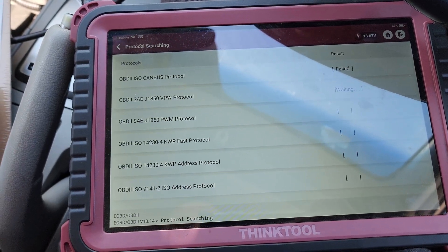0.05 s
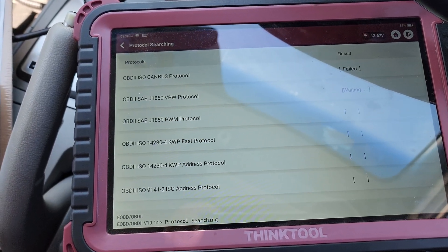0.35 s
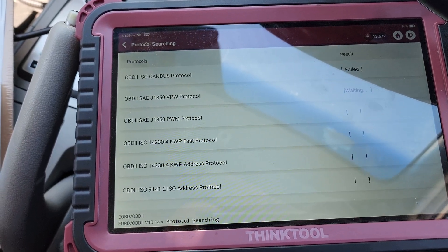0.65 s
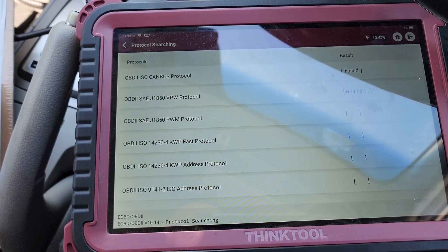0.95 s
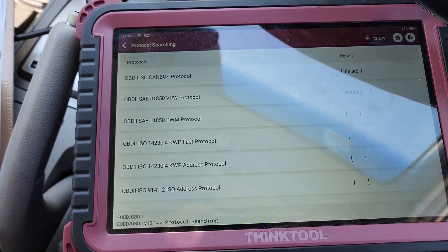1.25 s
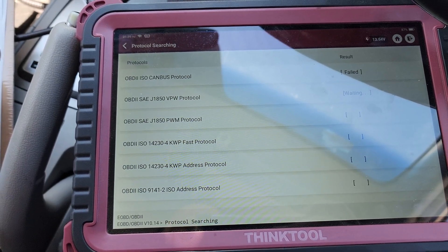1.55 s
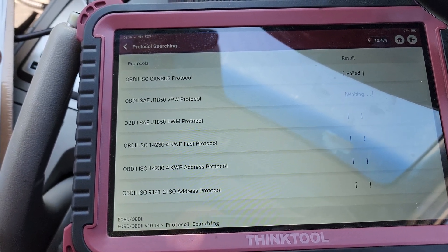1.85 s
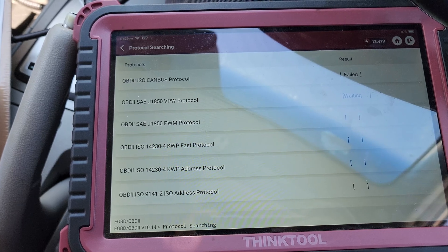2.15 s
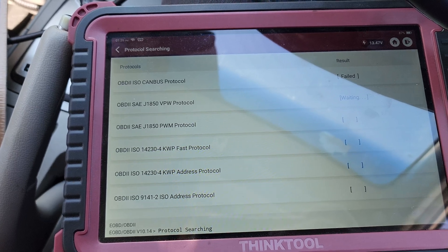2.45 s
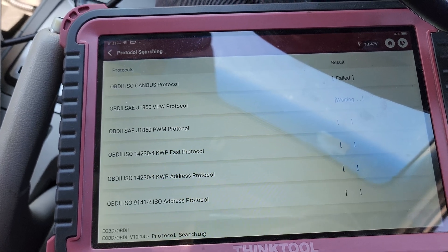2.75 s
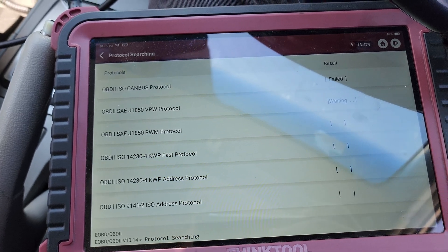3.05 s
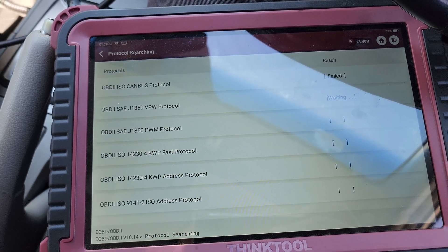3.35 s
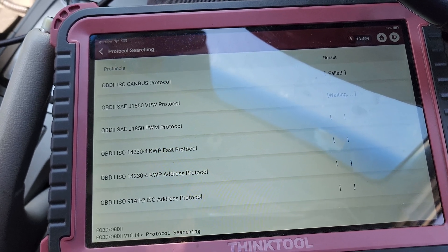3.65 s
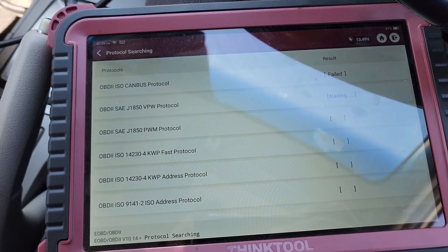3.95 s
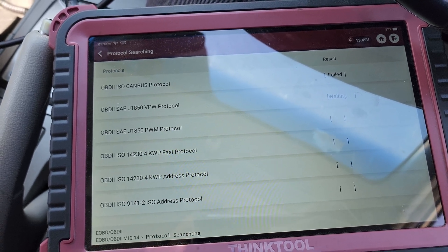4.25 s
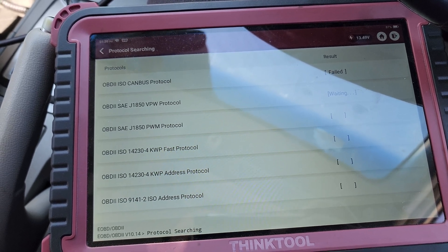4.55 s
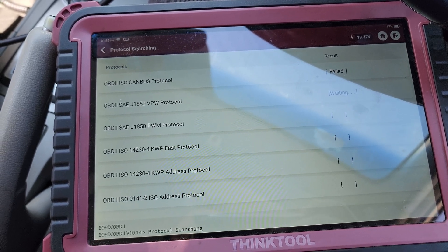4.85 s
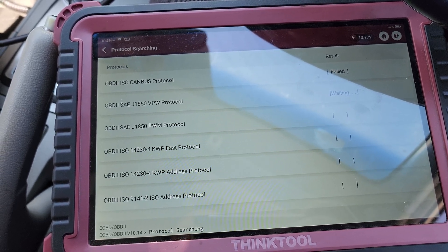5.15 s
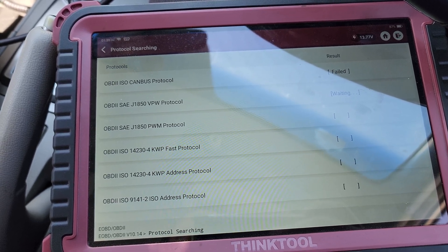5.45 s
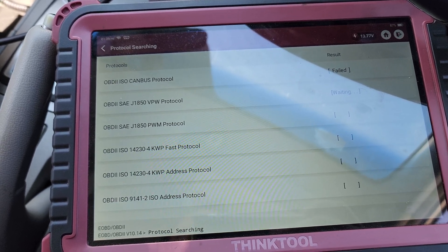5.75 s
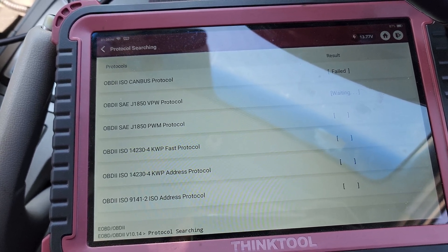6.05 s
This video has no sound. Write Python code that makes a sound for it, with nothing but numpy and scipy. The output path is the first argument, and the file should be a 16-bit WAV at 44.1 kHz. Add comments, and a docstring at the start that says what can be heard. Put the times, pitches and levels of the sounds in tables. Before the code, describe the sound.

Inside a parked car, a petrol engine drops steadily from fast idle to a slow, rough idle. Its deep hum falls in pitch and softens, booming in the cabin and shuddering with irregular misfires. The engine bay whirs behind it and air hisses faintly behind the dash. Close to the microphone, a hand lightly scuffs a plastic tablet at the start and again about two seconds in.

```python
"""Rough idle from inside the car

In a car parked in a workshop, a six-cylinder petrol engine with one weak cylinder sinks from fast idle
to idle, stumbling and misfiring. Its orders sweep down through the cabin's booms over a lumpy shudder.
Beyond the bulkhead the engine bay whirs and the intake growls; air hisses behind the dash.
Close to the two-port microphone, a hand shifts its grip on a plastic tablet."""
import sys
import numpy as np
from scipy import signal
from scipy.fft import rfft, irfft, next_fast_len
from scipy.io import wavfile

SR = 44100
rng = np.random.default_rng(int(sys.argv[2]) if len(sys.argv) > 2 else 0)


def file_out(sig):
    """Save sig as 16-bit WAV at sys.argv[1]."""
    # one column per channel
    cols = np.atleast_2d(sig).T
    # limit, then scale
    lim = np.clip(cols, -1, 1)
    pcm = np.round(lim * 32767).astype(np.int16)
    wavfile.write(sys.argv[1], SR, pcm)


N = 268877
TIME = np.arange(N) / SR
FFT_SIZE = next_fast_len(N, True)
FREQS = np.maximum(np.fft.rfftfreq(FFT_SIZE, 1 / SR), 1)

# stereo width of diffuse sound at the microphone: f/Hz, side minus mid/dB
STEREO_WIDTH = [(30, -27), (55, -25), (68, -16.5), (120, -20.5), (160, -5), (200, -13), (270, -6.5),
                (400, -13.5), (700, 3), (1100, -3.5), (2200, -2), (3000, -0.5), (15000, 0.5)]
# balance of the microphone's two ports: f/Hz, left minus right/dB
PORT_BALANCE = [(60, 0.5), (110, 0), (200, -2.5), (380, 1.5), (700, 1), (1000, -2), (1300, -1.5),
                (1750, -4), (2400, -1), (2800, 1.5), (4400, -4.5), (8120, 2.5), (15000, 5)]

# air behind the dash, before each band's trim: t/s, low band/dB, middle band/dB, top band/dB
HISS_LEVELS = [(0, -59, -59, -68.5), (1.4, -59, -60.5, -71), (2.1, -59, -62, -66),
               (3.85, -56.5, -62.5, -71.5), (4.4, -57.5, -63, -73), (4.95, -55.5, -60.5, -71.5),
               (5.3, -59, -67.5, -78), (6.1, -57.5, -64.5, -79.5)]
# spectra of those three bands: f/Hz, relative level/dB
HISS_LOW_COLOUR = [(1500, -16.5), (2600, -1), (2980, 3), (3400, -0.5), (3900, 1), (4700, -2.5),
                   (5100, -11.5), (9000, -36)]
HISS_MID_COLOUR = [(2500, -36), (4400, -4.5), (5350, 0.5), (5800, 0.5), (6100, 1.5), (6300, 5.5),
                   (6550, -1.5), (7000, 2), (7350, 3.5), (7650, -3), (8100, -4.5), (8700, -18),
                   (11000, -44)]
HISS_TOP_COLOUR = [(5000, -14), (8700, -1), (10500, 0), (13000, -5), (16000, -2.5)]
# thin air whistles: peak t/s, half length/s, f/Hz, level/dB
AIR_WHISTLES = [(0.9, .3, 7250, -63.5), (0.88, 0.32, 6900, -64), (4.1, .65, 7330, -68)]
# scuffs and ticks of the hand on the tablet:
# peak t/s, rise/s, fade/s, level/dB, ring f/Hz, width/Hz, rub against ring/dB, left minus right/dB
HAND_SCUFFS = [(.045, 0.097, 0.053, -48, 3520, 590, -12, 5), (.04, 0.073, 0.044, -57.5, 5200, 396, -1, 13),
               (.05, 0.058, 0.055, -50, 3600, 180, -43.5, -6), (.15, 0.015, 0.022, -57, 3600, 600, -9, 5),
               (.245, 0.037, 0.075, -53, 3640, 650, -8, 3), (0.242, .003, .007, -63.5, 12100, 3540, -16, 4),
               (1.69, 0.002, 0.0066, -48, 1750, 2400, -30, -9),
               (1.691, 0.002, .004, -56, 4900, 1300, -20, -1),
               (1.803, 0.0027, .008, -60, 11900, 1400, -13, 0),
               (1.872, 0.019, 0.052, -50.5, 7100, 750, -24, 4.5),
               (1.895, 0.044, .07, -63, 12100, 1400, -15, -2), (2.055, 0.008, 0.08, -58, 7000, 550, -28, 6),
               (2.188, 0.037, 0.035, -62, 7440, 550, -35.5, 2)]

# spectra of the drone and whirr from the engine bay: f/Hz, relative level/dB
BAY_DRONE_COLOUR = [(50, -18), (78, -2), (98, 2.5), (125, 2.5), (170, -7), (200, -6), (255, -19),
                    (400, -14.5), (480, -16.5), (570, -26), (1000, -35), (4000, -100)]
WHIRR_COLOUR = [(200, -2), (400, 1.5), (620, 0.5), (900, 1), (1020, -5), (1300, -2), (1500, -2), (1750, -4),
                (2120, -5), (2300, -12), (2480, -17), (9000, -55)]
# resonances of bulkhead and dash, and of the intake, as heard in the cabin:
# f/Hz, width/Hz, relative level/dB, left minus right/dB, left phase lead/rad
BULKHEAD_MODES = [(940, 70, -4, -9, -1.4), (1086, 120, -4, -2, 3), (1215, 120, -5, 4.5, -2.5),
                  (1400, 108, -5.5, -4, 0.5), (1522, 200, 0.5, -3, 2), (1826, 150, -8.5, -10, 1.76),
                  (2000, 54, -4.5, -2.5, 2), (2290, 220, -8, 2, -3)]
INTAKE_RESONANCES = [(607, 133, 1, -8, -0.52), (723, 109, -1, 3, 0.37), (826, 105, 0.5, 3.5, -0.55)]
# rush of the intake, before its trim: t/s, level/dB
INTAKE_LEVELS = [(0, -53.5), (1.2, -52), (1.65, -49), (2.3, -50), (2.75, -51.5), (3.1, -53), (4.4, -53.5),
                 (4.9, -51), (5.3, -55), (6.1, -57)]
# brief growls of the intake: peak t/s, half length/s, level/dB
INTAKE_GROWLS = [(1.61, 0.035, -48), (1.91, 0.063, -45.5), (2.3, 0.16, -49.5), (2.683, 0.14, -52)]

# the slowing crankshaft: t/s, speed/(turns per s)
CRANK_SPEED = [(0.0, 26.42), (0.5, 25.62), (1.0, 24.6), (1.5, 23.41), (2.0, 21.98), (2.5, 20.38),
               (3.0, 18.96), (3.5, 17.77), (4.0, 16.53), (4.5, 15.72), (5.0, 14.55), (5.5, 13.78),
               (6.1, 12.91)]
# strength of each cylinder in firing order: relative level/dB
CYLINDER_LEVELS = [-1, -3, -2, -16, -1.5, -3.5]
# the engine's hardest stumbles: t/s, added body shake/dB, added cabin throb/dB
ENGINE_STUMBLES = [(.44, -31, -42), (.64, -23.5, -38), (.81, -30, -33), (.97, -28, -46), (1.35, -42, -25),
                   (1.51, -30, -46), (1.92, -42, -30), (2.13, -31, -51), (2.65, -26.5, -43),
                   (2.84, -29, -39), (3.07, -36, -32), (3.36, -45, -34.5), (5.94, -39, -38)]
# misfires: t/s, level change/dB
MISFIRE_DIPS = [(.17, -5), (1.24, -3.5), (1.58, -2.5), (2.01, -1.5), (2.71, -5), (3.13, -5), (3.49, -3.5),
                (3.99, -5.5), (4.42, -6), (5.31, -2), (5.7, -5.5), (5.859, -5)]
# spectra of the body's shake and the cabin air's throb: f/Hz, relative level/dB
BODY_SHAKE_COLOUR = [(8, -49), (17, -24), (23, -12), (32, -5), (46, -5.5), (54, -6), (70, -34.5),
                     (200, -140)]
CABIN_THROB_COLOUR = [(30, -59), (52, -7), (62, 2), (72, -3.5), (85, -20), (250, -140)]
# cabin resonances rung by the firings: f/Hz, width/Hz, relative level/dB
CABIN_MODES = [(43, 4.5, 1), (62, 7.3, 5.5), (113.6, 29, 0.5), (157.3, 13.4, -3), (199.9, 6.7, -1.5),
               (214.3, 31, -7.5), (334, 45, -12), (390, 100, -10)]
# engine orders that enter through the mounts and through the panels: cycles per turn, relative level/dB
ORDERS_VIA_MOUNTS = [(3, 0), (6, 0)]
ORDERS_VIA_PANELS = [(5, -1.5), (8, -4), (9, 0), (11, -13), (12, -11), (15, -12)]
# body and panel modes that those orders cross: f/Hz, width/Hz, gain at the crossing/dB
BODY_RESONANCES = [(43.5, 4.9, -33), (63.9, 3.7, -26.5), (78.5, 16, -37.5), (108, 2.8, -31),
                   (116.1, 3.84, -22), (124.1, 8.6, -26.5), (131.6, 8.5, -31), (143, 3.9, -33),
                   (152.9, 6.4, -34.5)]
PANEL_RESONANCES = [(119.6, 7.8, -33), (127.4, 4.2, -35.5), (145.7, 8.3, -32), (169, 4.6, -37),
                    (181.9, 7, -41), (193.9, 8.3, -30.5), (203.1, 5.3, -33), (212.9, 4.76, -35),
                    (221.8, 7.6, -34.5), (243, 4.5, -36.5), (296, 15, -42.5), (322, 8, -36),
                    (343.5, 25, -38.5)]


def undb(db):
    """Decibels to gain."""
    return 10 ** (np.asarray(db) / 20)


def unit(x):
    """Scale to rms 1."""
    return x / np.sqrt(np.mean(x ** 2))


def curves(table):
    """Each column of a time table, sample by sample."""
    times, *columns = np.transpose(table)
    return [np.interp(TIME, times, column) for column in columns]


def gains(points):
    """Gain at every frequency from points of f/Hz, level/dB."""
    hz, db = np.transpose(points)
    return undb(np.interp(np.log(FREQS), np.log(hz), db))


def resonance(hz, width):
    """Response of one damped mode, 1 at its centre."""
    return 1 / (1 + 1j * (FREQS / hz - hz / FREQS) * hz / width)


def filtered(x, response):
    """Filter by a frequency response; rms 1."""
    return unit(irfft(rfft(x, FFT_SIZE) * response)[..., :N])


def wander(rate_hz):
    """Random drift with a spread near 1."""
    return np.interp(TIME * rate_hz, np.arange(8192), rng.standard_normal(8192))


def swell(peak_s, half_s):
    """A smooth rise and fall around one moment, 1 at the top."""
    return np.exp(-((TIME - peak_s) / half_s) ** 2)


def diffuse_noise(colour):
    """Coloured noise at the two ports: alike in the bass, less so in the treble."""
    width = gains(STEREO_WIDTH)
    mid, side = rfft(rng.standard_normal((2, FFT_SIZE)))
    ports = np.array([mid + width * side, mid - width * side]) / np.sqrt(1 + width ** 2)
    return unit(irfft(ports * gains(colour))[:, :N])


def dash_hiss(trims_db=(-1.1, 1.3, 3.5), flicker_db=1.1, whistle_width_hz=340):
    """Air hisses behind the dash in three bands, with thin whistles that come and go."""
    low_db, mid_db, top_db = [db + trim for db, trim in zip(curves(HISS_LEVELS), trims_db)]
    out = diffuse_noise(HISS_LOW_COLOUR) * undb(low_db + flicker_db * wander(9))
    out += diffuse_noise(HISS_MID_COLOUR) * undb(mid_db + flicker_db * wander(9))
    out += diffuse_noise(HISS_TOP_COLOUR) * undb(top_db)
    for peak_s, half_s, hz, db in AIR_WHISTLES:
        whistle = filtered(rng.standard_normal((2, N)), resonance(hz, whistle_width_hz) ** 2)
        out += whistle * undb(db) * swell(peak_s, half_s)
    return out


def cabin_reflections(x, echo_db=-10, fade_s=0.02):
    """Nearby glass and trim return a short cluster of echoes that combs each port differently."""
    echoes = rng.standard_normal((2, 4096)) * np.exp(-TIME[:4096] / fade_s)
    echoes /= np.sqrt(np.sum(echoes ** 2, axis=1, keepdims=True))
    share = undb(echo_db) * FREQS ** 2 / (FREQS ** 2 + 500 ** 2)  # long waves fill the cabin evenly
    response = (1 + share * rfft(echoes, FFT_SIZE)) / np.sqrt(1 + share ** 2)
    return irfft(rfft(x, FFT_SIZE) * response)[:, :N]


def tablet_scuffs(grain_db=3):
    """Close to the microphone, skin sticks and slips on plastic; each gritty burst rings the case."""
    out = 0
    grit = rng.standard_normal((2, N)) * undb(grain_db * wander(600))
    rub = unit(np.abs(resonance(hz=4800, width=5700)) ** 2)
    for peak_s, rise_s, fade_s, db, hz, width, rub_db, pan_db in HAND_SCUFFS:
        envelope = np.exp(np.minimum((TIME - peak_s) / rise_s, (peak_s - TIME) / fade_s).clip(-30))
        ring = unit(np.abs(resonance(hz, width)) ** 2)
        port_gains = undb(db + np.array([[pan_db], [-pan_db]]) / 2)
        out += filtered(grit, ring + undb(rub_db) * rub) * envelope * port_gains
    return out


def ringing(modes, flicker_db=1.0):
    """Noise in resonances that each flicker alone and reach the ports with their own balance and lag."""
    out = 0
    for hz, width, db, pan_db, lead in modes:
        left = undb(pan_db / 2) * np.exp(0.5j * lead)
        ports = resonance(hz, width) ** 2 * np.array([[left], [1 / left]])
        out += filtered(rng.standard_normal(N), ports) * undb(db + flicker_db * wander(12))
    return unit(out)


def intake_growls(hz=725, width_hz=130):
    """One resonance of the intake swells briefly into a growl."""
    ring = filtered(rng.standard_normal(N), resonance(hz, width_hz) ** 2)
    return ring * sum(undb(db) * swell(peak_s, half_s) for peak_s, half_s, db in INTAKE_GROWLS)


def engine_bay(turns, octaves, whirr_db=-49, modes_db=-50.5, drone_db=-33, intake_trim_db=0.37):
    """Through the bulkhead: a drone follows speed and load; whirr and intake pulse with the firings."""
    intake_db, = curves(INTAKE_LEVELS)
    whirr = diffuse_noise(WHIRR_COLOUR) * undb(whirr_db) + ringing(BULKHEAD_MODES) * undb(modes_db)
    whirr *= undb(0.82 * wander(25))  # slight flicker
    rush = ringing(INTAKE_RESONANCES) * undb(intake_db + intake_trim_db)
    load_db = 0.35 * (intake_db - intake_db.mean())  # the drone follows part of the intake's swell
    drone = diffuse_noise(BAY_DRONE_COLOUR) * undb(drone_db + 0.5 * octaves + load_db)
    pulsing = 1 + 0.046 * np.cos(np.pi * len(CYLINDER_LEVELS) * turns)
    return drone + pulsing * (whirr + rush)


def rumble(colour, evenness=0.9, smoothing_hz=25):
    """A narrow band of deep shaking, steadier than plain noise."""
    shake = diffuse_noise(colour)
    envelope = np.abs(signal.hilbert(shake.mean(axis=0), FFT_SIZE))
    envelope = filtered(envelope, np.exp(-(FREQS / smoothing_hz) ** 2))
    return unit(shake / np.maximum(envelope, 0.1) ** evenness)


def shudder(octaves, shake_db=-32.5, throb_db=-34.5, lumpy_db=1.7):
    """The body shakes on its mounts and the cabin's lowest air mode throbs, harder at each stumble."""
    shake_gain = undb(shake_db + 1.5 * octaves + lumpy_db * wander(14))
    throb_gain = undb(throb_db + 7 * octaves + lumpy_db * wander(12))
    for peak_s, added_shake_db, added_throb_db in ENGINE_STUMBLES:
        lurch = swell(peak_s, half_s=0.015)
        shake_gain += undb(added_shake_db) * lurch
        throb_gain += undb(added_throb_db) * lurch
    shaking = rumble(BODY_SHAKE_COLOUR) * shake_gain + rumble(CABIN_THROB_COLOUR) * throb_gain
    return signal.sosfilt(signal.butter(4, 150, fs=SR, output="sos"), shaking)


def firings(turns, scatter_db=3, jitter_s=0.00057, dull_hz=450):
    """Three firings a turn, one cylinder in six weak, ring the cabin with dull thuds."""
    firing_count = np.floor(turns * len(CYLINDER_LEVELS) / 2)
    due = np.flatnonzero(np.diff(firing_count))
    jitter, scatter = rng.standard_normal((1024, 2))[:len(due)].T
    onsets = np.clip(due + (jitter_s * SR * jitter).astype(int), 0, N - 1)
    pulses = np.zeros(N)
    pulses[onsets] = undb(np.resize(CYLINDER_LEVELS, len(due)) + scatter_db * scatter)
    cabin = sum(undb(db) * resonance(hz, width) ** 2 for hz, width, db in CABIN_MODES)
    return filtered(pulses, cabin / (1 + (FREQS / dull_hz) ** 4))


def booms(turns, speed, octaves, orders, modes, floor_db=-50, waver_db=0.65, side_db=-16):
    """Each engine order booms around the microphone while its pitch crosses a mode."""
    out = 0
    for order, db in orders:
        crossing = 0
        for k, (hz, width, peak_db) in enumerate(modes):
            detuning = 2 * (order * speed - hz) / width
            # neighbouring modes swing in opposite senses, so the hum breaks off between them
            crossing += (-1) ** k * undb(peak_db) * 0.5 ** (detuning ** 2)
        drive = undb(db + 3 * octaves + waver_db * wander(19))
        phase = 2 * np.pi * (order * turns + rng.random())
        phase += 0.1 * wander(14)  # the uneven burn makes the phase slip
        tone = np.sqrt(2) * (crossing + 1j * undb(floor_db)) * drive * np.exp(1j * phase)
        out += tone.imag + undb(side_db) * tone.real * np.array([[1], [-1]])
    return out


def misfires(half_s=0.034):
    """Gain of the engine's low sounds: a short dip at each misfire."""
    return undb(sum(db * swell(at_s, half_s) for at_s, db in MISFIRE_DIPS))


def scene(thud_db=-42.5):
    """From inside the cabin: the engine slows, softens and falters over bay noise, hiss and handling."""
    speed, = curves(CRANK_SPEED)
    turns = np.cumsum(speed) / SR
    octaves = np.log2(speed / 20)  # doublings from 20 turns per s; its factors are dB per doubling
    thuds = firings(turns) * undb(thud_db) * (speed / speed.mean()) ** 0.3
    body_booms = booms(turns, speed, octaves, ORDERS_VIA_MOUNTS, BODY_RESONANCES)
    panel_booms = booms(turns, speed, octaves, ORDERS_VIA_PANELS, PANEL_RESONANCES)
    engine = (body_booms + panel_booms + thuds + shudder(octaves)) * misfires()
    background = engine_bay(turns, octaves) + cabin_reflections(dash_hiss())
    return background + tablet_scuffs() + intake_growls() + engine


def record(dry, top_hz=15750):
    """Each port of the microphone has its own colour; the top is cut steeply."""
    left = np.sqrt(gains(PORT_BALANCE))
    ports = irfft(rfft(dry, FFT_SIZE) * np.array([left, 1 / left]))[:, :N]
    return signal.sosfilt(signal.ellip(10, 0.2, 80, top_hz, fs=SR, output="sos"), ports)


dry = scene()
out = record(dry)
file_out(out)
```